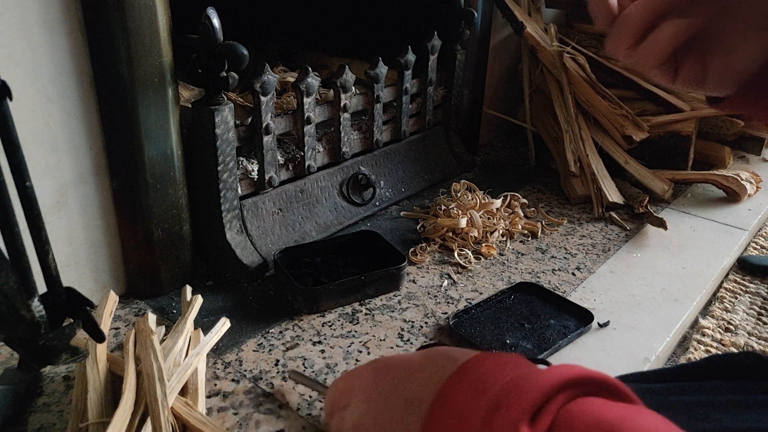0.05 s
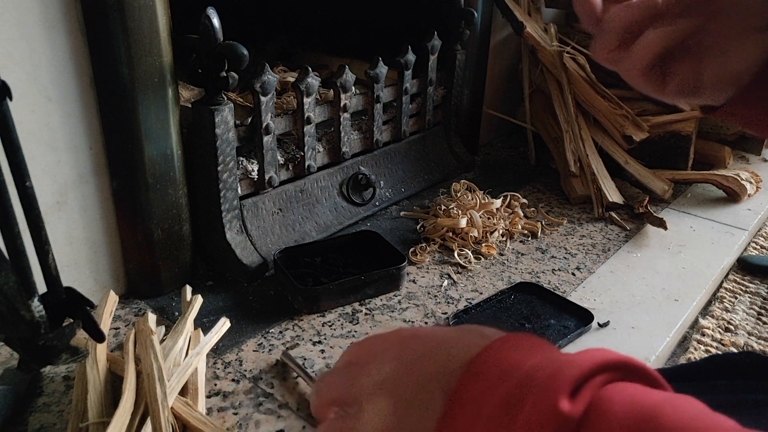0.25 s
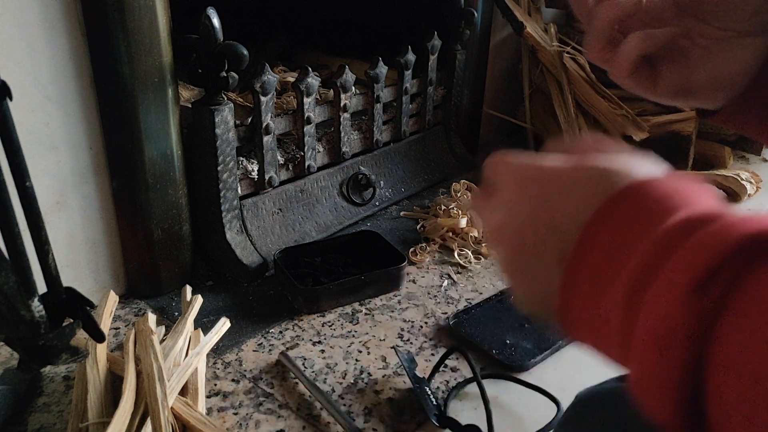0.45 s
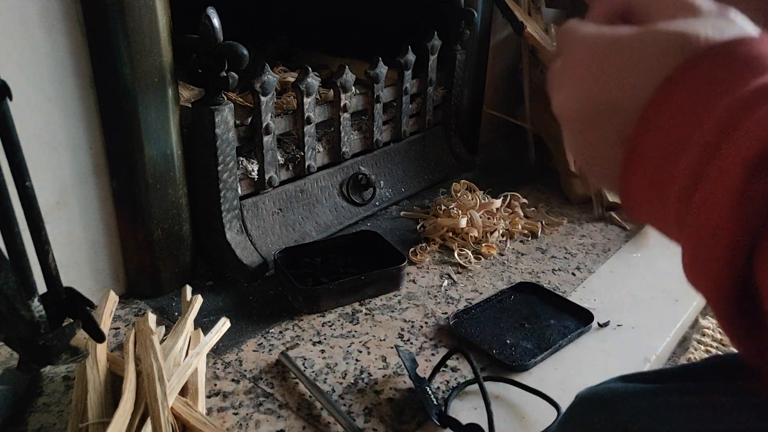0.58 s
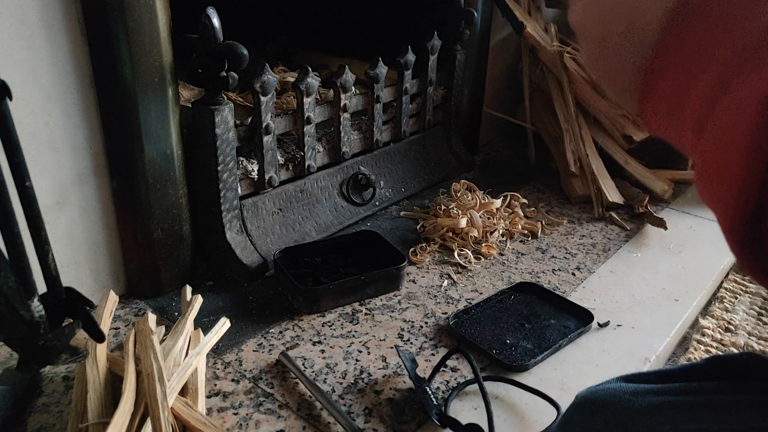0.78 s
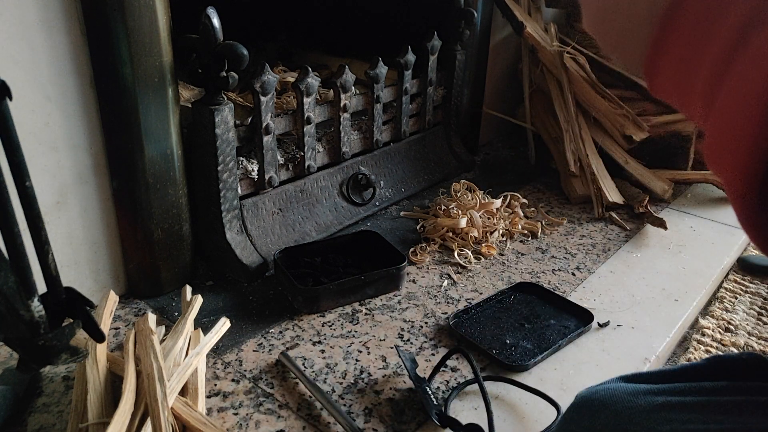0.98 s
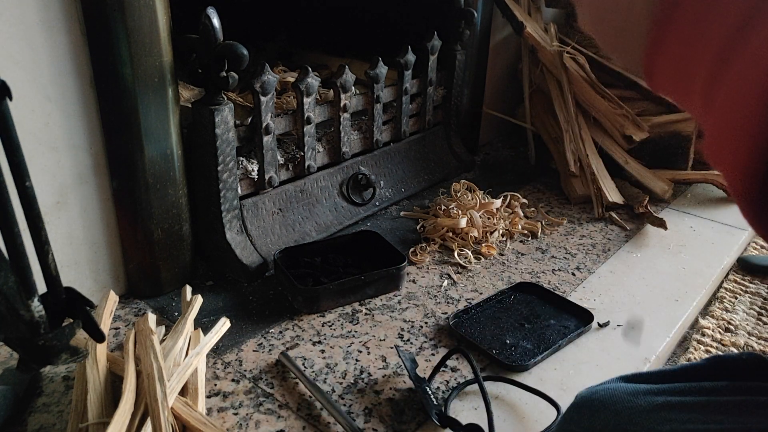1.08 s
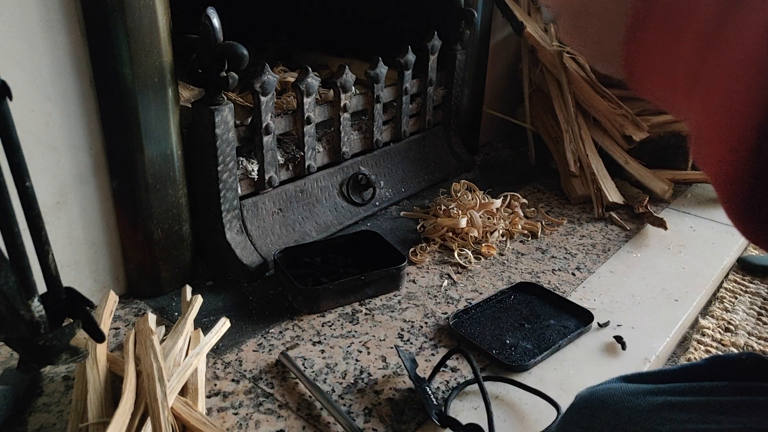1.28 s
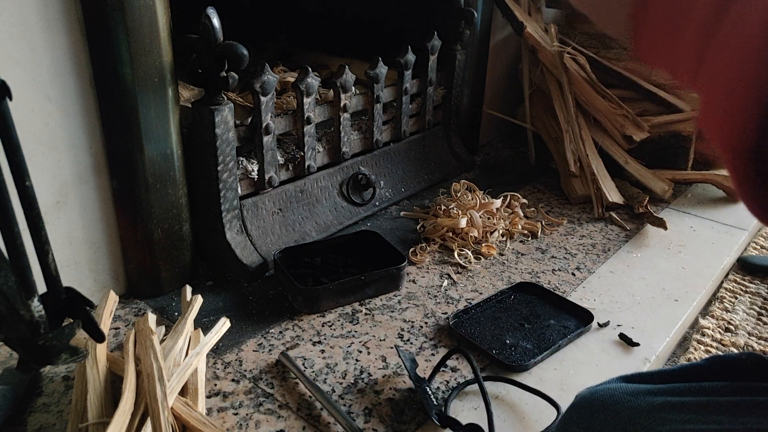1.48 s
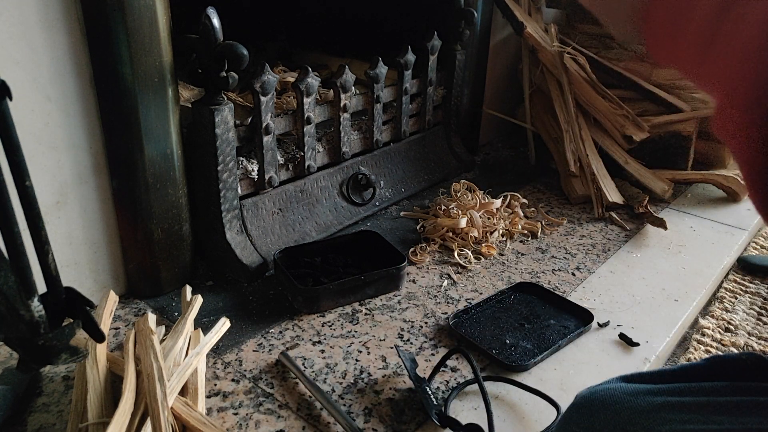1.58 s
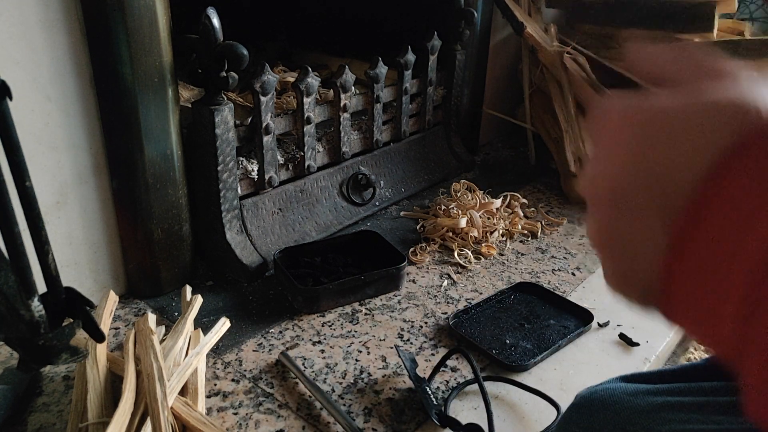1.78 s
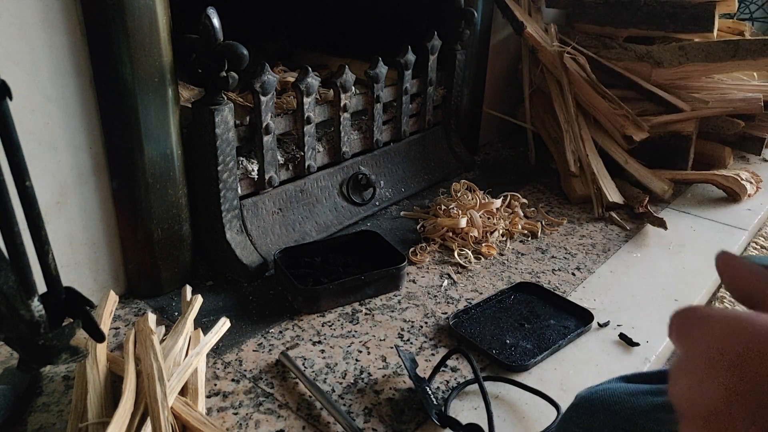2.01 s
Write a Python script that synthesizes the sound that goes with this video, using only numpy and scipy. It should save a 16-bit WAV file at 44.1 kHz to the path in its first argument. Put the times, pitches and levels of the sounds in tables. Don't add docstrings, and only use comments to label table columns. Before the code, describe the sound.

A steel rod clatters onto a stone hearth with a bright clink, then soft tinder rustling

```python
import sys
import numpy as np
from scipy import signal
from scipy.fft import rfft, irfft
from scipy.io import wavfile
from scipy.ndimage import uniform_filter1d

SR = 44100
rng = np.random.default_rng(int(sys.argv[2]) if len(sys.argv) > 2 else 0)


def linear_from_db(decibels):
    return 10 ** (np.asarray(decibels, float) / 20)


def wav_record(signal):
    frames = np.transpose(np.atleast_2d(signal))
    bounded = np.clip(frames, -1, 1)
    quanta = np.round(bounded * 32767).astype(np.int16)
    wavfile.write(sys.argv[1], SR, quanta)


N = 90404

# (frequency [Hz], left-right correlation [-1..1])
LIKENESS = [(60, 1), (240, 0.92), (950, -0.14), (3770, 0.04), (15000, -0.39)]
# (frequency [Hz], left over right [dB])
BALANCE = [(60, 0), (240, 2.5), (950, -0.5), (3770, 3), (15000, -6)]


def evened(x):
    return x / np.sqrt(np.mean(x ** 2) + 1e-20)


def read(points, hz):
    f, value = np.transpose(points)
    return np.interp(np.log(hz + 1), np.log(f + 1), value)


def add(mix, start_s, sound):
    part = mix[..., round(max(start_s, 0) * SR):][..., :sound.shape[-1]]
    part += sound[..., :part.shape[-1]]


def resonate(x, hz, width_hz):
    turn = np.exp(2j * np.pi * hz * np.arange(x.shape[-1]) / SR)
    r = np.exp(-np.pi * width_hz / SR)
    return 2 * (turn * signal.lfilter([1 - r], [1, -r], x / turn)).real


def sides(db):
    return linear_from_db(np.array([[db / 2], [-db / 2]]))


def hush():
    # (frequency [Hz], level per Hz [dB])
    hush_spectrum = [(59, -29), (100, -2.5), (304, -20.5), (392, -21), (2860, -29), (7650, -30),
                     (9880, -39.5), (15100, -36.5), (16500, -58.5)]
    level_db, patch_db = -55.5, 2.2
    frames, hz = N // 256 + 5, np.fft.rfftfreq(1024, 1 / SR)
    a, b, c, d, patches = rng.standard_normal((frames, 513, 5)).T
    patches = uniform_filter1d(patches, size=12, axis=0)
    patches = evened(uniform_filter1d(patches, size=10, axis=1))
    same = np.clip(read(LIKENESS, hz), -1, 1)[:, None]
    left = a + 1j * b
    right = same * left + np.sqrt(1 - same ** 2) * (c + 1j * d)
    lean_db = np.array([.5, -.5])[:, None, None] * read(BALANCE, hz)[:, None]
    gain = linear_from_db(read(hush_spectrum, hz)[:, None] + patch_db * patches + lean_db)
    noise = signal.istft(np.array([left, right]) * gain, nperseg=1024, noverlap=768)[1]
    return linear_from_db(level_db) * evened(noise[:, :N])


def boards():
    # (time [s], length [s], level [dB], frequency [Hz])
    thumps = [(0, 0.081, -36, 87.6), (0.056, 0.13, -38.5, 66), (.25, 0.12, -41.5, 85.3),
              (0.472, 0.13, -38.5, 92.6), (0.727, 0.085, -46.5, 60.5), (0.803, 0.093, -41.5, 62),
              (0.948, .13, -32.5, 50.3), (1.17, 0.08, -37, 89), (1.208, 0.095, -38, 62),
              (1.38, 0.25, -28.5, 61.6), (1.59, 0.18, -34.5, 61.6), (1.8, 0.15, -36.5, 65.8),
              (1.92, .08, -39, 86.3)]
    # (time [s], level [dB])
    weight_shift = [
        (0.0, -62.5),
        (1.69, -41),
        (2.05, -56),
    ]
    drift_db, drift_hz = -41, 6.2
    sway_hz, sway_width_hz = 35.4, 28.5
    rise_power, wander, lean_db = 0.63, 0.093, 2
    drift = resonate(resonate(rng.standard_normal(N), 0., drift_hz), 0., drift_hz)
    sway = resonate(rng.standard_normal(N), sway_hz, sway_width_hz)
    sway = resonate(sway, sway_hz, sway_width_hz)
    sway_db = np.interp(np.arange(N) / SR, *np.transpose(weight_shift))
    out = linear_from_db(drift_db) * evened(drift) + evened(sway) * linear_from_db(sway_db)
    for start_s, length_s, db, hz in thumps:
        u = np.arange(0, 1, 1 / (length_s * SR))
        wander_phase, phase = rng.random(2)
        bend = 1 + wander * np.sin(2 * np.pi * (1.7 * u + wander_phase))
        swell = np.sin(np.pi * u ** rise_power) ** 1.51
        note = np.sin(2 * np.pi * (np.cumsum(hz * bend) / SR + phase))
        add(out, start_s, linear_from_db(db) * swell * note)
    return out * sides(lean_db)


def hands():
    # (time [s], length [s], level [dB], centre [Hz], width [Hz])
    strokes = [(0.653, .04, -56.5, 6340, 3500), (0.752, 0.091, -53.5, 5300, 3030),
               (.84, 0.029, -60, 6060, 2000), (0.928, 0.18, -57.5, 5000, 4000),
               (1.05, 0.11, -56.5, 5200, 3520), (1.147, 0.073, -60, 3000, 2980),
               (1.47, 0.073, -52, 4950, 1790), (1.599, 0.087, -62.5, 2800, 2500),
               (1.801, 0.16, -63.5, 2500, 2490), (1.96, 0.14, -62.5, 5500, 4000),
               (0.719, 0.12, -56, 427, 500), (0.958, 0.19, -55, 912, 110), (0.987, 0.14, -57, 563, 110),
               (0.944, 0.043, -51.5, 252, 406), (1.16, 0.045, -54, 254, 149), (1.39, 0.06, -59, 350, 500),
               (1.451, 0.068, -50.5, 250, 350), (1.599, 0.085, -57, 340, 500),
               (1.808, 0.13, -61, 1095, 250), (1.82, .22, -49, 285, 430), (0, 0.058, -54, 297, 497)]
    # (time [s], level [dB], frequency [Hz])
    fibre_snaps = [
        (0.668, -44.5, 326),
        (0.724, -30.5, 336),
        (1.15, -37.5, 328),
        (1.463, -40.5, 354),
        (1.841, -33, 328),
        (1.9, -46.5, 355),
    ]
    grains_per_s, grain_db, smooth = 2200, 3., .6
    snap_t60_s = 0.02
    out = np.zeros((2, N))
    for start_s, length_s, db, hz, width_hz in strokes:
        u = np.arange(0, 1, 1 / (length_s * SR))
        noise = rng.standard_normal((3, SR // 3))
        draw, size = rng.random(SR // 3), rng.exponential(1, SR // 3)
        struck = draw < grains_per_s / SR
        grains = evened(struck * linear_from_db(grain_db * size) * np.sign(noise[2]))
        alike = np.clip(read(LIKENESS, hz), 0, 1)
        rustle = alike * noise[2] + np.sqrt(1 - alike ** 2) * noise[:2]
        drive = (1 - smooth) * grains + smooth * rustle
        stroke = resonate(resonate(drive, hz, width_hz), hz, 2 * width_hz)
        stroke = evened(stroke)[:, :len(u)]
        swell = np.sin(np.pi * u[:stroke.shape[1]] ** 0.67)
        add(out, start_s, linear_from_db(db) * sides(read(BALANCE, hz)) * swell * stroke)
    t = np.arange(1000) / SR
    for start_s, db, hz in fibre_snaps:
        burst = rng.standard_normal((2, 1000)) * linear_from_db(-60 * t / snap_t60_s)
        add(out, start_s, linear_from_db(db + 5.5) * resonate(burst, hz, hz))
    return out


def ring(modes, db):
    lag_s, spread_db = .00018, 2.5
    t = np.arange(SR // 3) / SR - np.array([[lag_s], [0]])
    onset = np.clip(t / 0.0005, 0, 1)
    out = np.zeros(t.shape)
    chance = rng.standard_normal((len(modes), 2))
    for (hz, mode_db, t60_s, lean_db), (share, phase) in zip(modes, chance):
        decay = linear_from_db(db + mode_db + spread_db * share - 60 * t / t60_s)
        out += sides(lean_db) * decay * np.sin(2 * np.pi * hz * t + phase) * onset
    return out


def rod():
    # (time [s], middle modes [dB], low modes over middle [dB], high modes over middle [dB])
    contacts = [(0.0613, -16, -7.5, -3), (0.1965, -22, -3, -11), (0.2314, -21, -27, -20.5),
                (0.2538, -20.5, -14, -40), (0.2718, -29, -18, -40.5), (0.2814, -16, -10.5, -3.5),
                (0.2927, -11.5, -20.5, -12.5), (0.3424, -9, -13, -22.5), (0.3764, -25.5, -2.5, -3.5),
                (0.3934, -18.5, -39, -11), (0.4034, -22, -16, -26.5)]
    # (time [s], tick level [dB], tick centre [Hz], slab knock [dB])
    ticks = [
        (0.0614, -15, 5360, -30.5),
        (.196, -24.5, 4900, -36),
        (.2305, -29, 7000, -42),
        (0.254, -26.5, 6800, -46.5),
        (0.272, -33, 6000, -46),
        (0.2917, -9.5, 6670, -18),
        (0.3429, -14.5, 7660, -34.5),
        (0.3766, -16.5, 6770, -40),
        (.394, -26.5, 4800, -34.5),
    ]
    # (frequency [Hz], level [dB], t60 [s], left over right [dB])
    low_modes = [(3561, -1.5, 0.15, 8.5), (3646, -4, 0.1, 6.5)]
    mid_modes = [(6170, 1.5, 0.11, 3.5), (6227, -4, .12, -4), (6350, -6.5, 0.066, -6.5),
                 (6410, -9.5, 0.043, -15)]
    high_modes = [(9367, 2.5, 0.044, -9.5), (8575, -16.5, .12, -10.5), (9550, -17.5, .08, -6.5),
                  (12600, -28.5, 0.13, -1), (15050, -30.5, .15, 3.5), (13350, -28, .1, -13.5)]
    slab_modes = [(272.3, -3, .14, 1), (338.4, -1, 0.04, 8), (643.3, -3.5, 0.11, 3.5),
                  (941, -4, 0.069, 7.5), (1198, -0.5, 0.029, 13.5), (1599, -1.5, 0.023, 13.5),
                  (2175, 4, 0.055, 4.5), (2900, -6.5, 0.025, -1.5)]
    tick_t60_s, tick_width_hz, skirt_db = .02, 1820, -2
    out, t = np.zeros((2, N)), np.arange(SR // 20) / SR
    for start_s, db, low_db, high_db in contacts:
        steel = ring(mid_modes, db - 6.5) + ring(low_modes, db + low_db)
        add(out, start_s, steel + ring(high_modes, db + high_db))
    for start_s, db, hz, slab_db in ticks:
        burst = rng.standard_normal((2, len(t))) * linear_from_db(-60 * t / tick_t60_s)
        peak = resonate(resonate(burst, hz, tick_width_hz), hz, tick_width_hz) * 2
        skirt = linear_from_db(skirt_db) * resonate(burst, 3300, 6250)
        add(out, start_s, linear_from_db(db) * (peak + skirt))
        add(out, start_s, ring(slab_modes, slab_db - 5.5))
    return out


def room(x):
    # (frequency [Hz], t60 [s])
    room_t60 = [(250, 0.58), (1000, 0.47), (4000, 0.35), (9000, 0.3), (15000, 0.19)]
    tail_db, early_db = -10.5, -8.5
    taps = np.zeros((2, SR // 2))
    at = np.arange(200, SR // 2 - 20, 20)
    at = at + rng.integers(0, 20, (2, len(at)))
    np.put_along_axis(taps, at, rng.choice([-1., 1.], at.shape), 1)
    hz, t, z = signal.stft(taps, SR, nperseg=256)
    decay = linear_from_db(-60 * t / read(room_t60, hz)[:, None])
    tail = signal.istft(z * decay, SR, nperseg=256)[1]
    tail *= linear_from_db(tail_db) / np.linalg.norm(tail[0])
    echoes = linear_from_db(early_db) * rng.uniform(-1.09, 1, (2, 7))
    np.put_along_axis(tail, rng.integers(40, 700, (2, 7)), echoes, 1)
    return signal.fftconvolve(x, tail, axes=1)[:, :N]


def scene():
    steel, near = rod(), hands()
    return steel + room(steel + .5 * near) + near + hush() + boards()


def top_cut(x):
    return signal.sosfilt(signal.butter(12, 16970, fs=SR, output="sos"), x)


def record(dry):
    hz = np.fft.rfftfreq(N, 1 / SR)
    dip = linear_from_db(-14 * np.exp(-((hz - 11300) / 1100) ** 2))
    return top_cut(irfft(rfft(dry) * dip, N))


dry = scene()
out = record(dry)
wav_record(out)
```